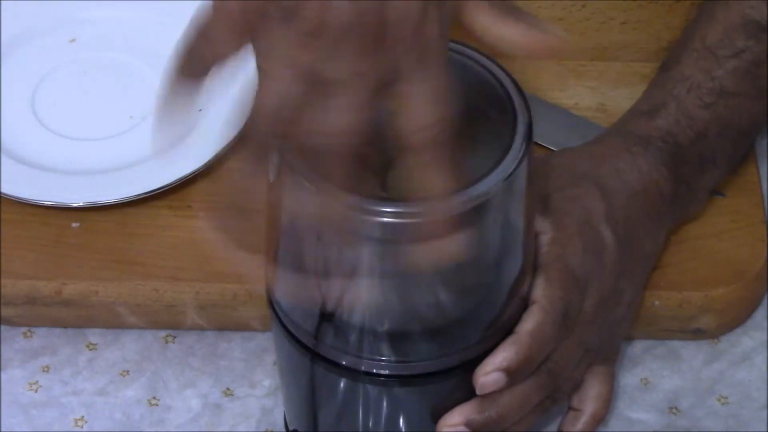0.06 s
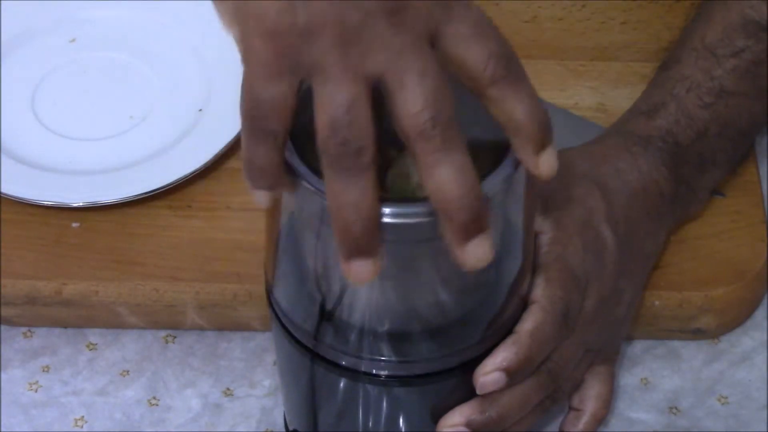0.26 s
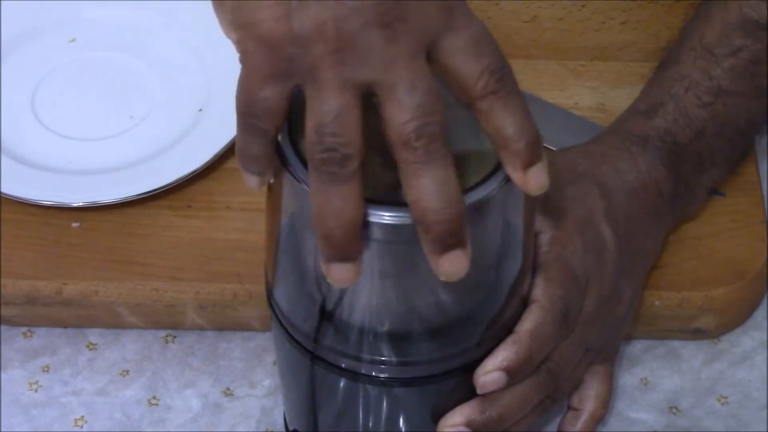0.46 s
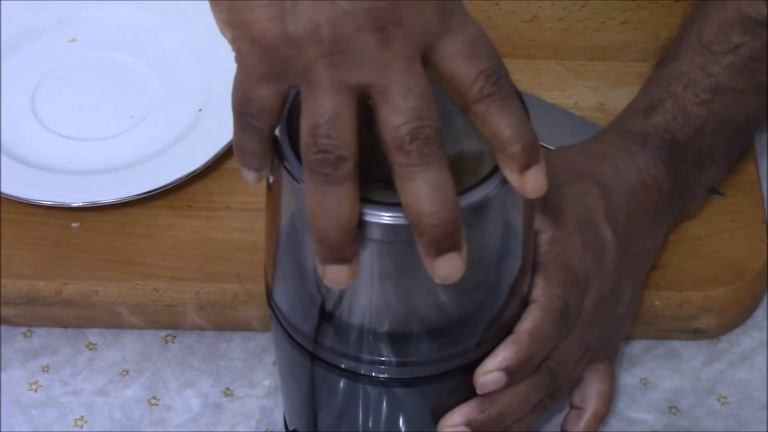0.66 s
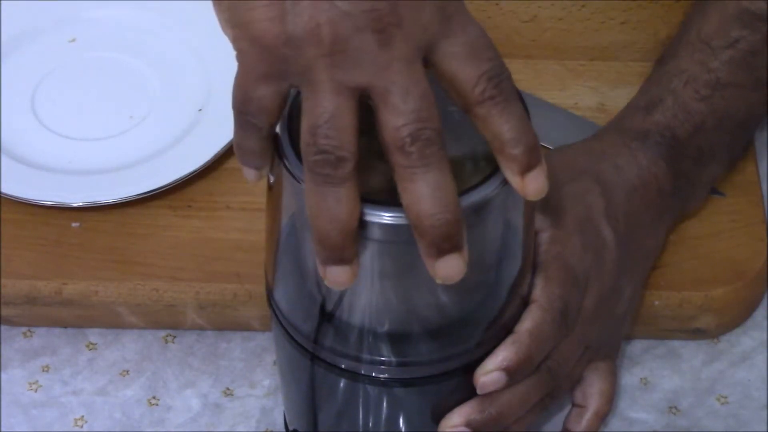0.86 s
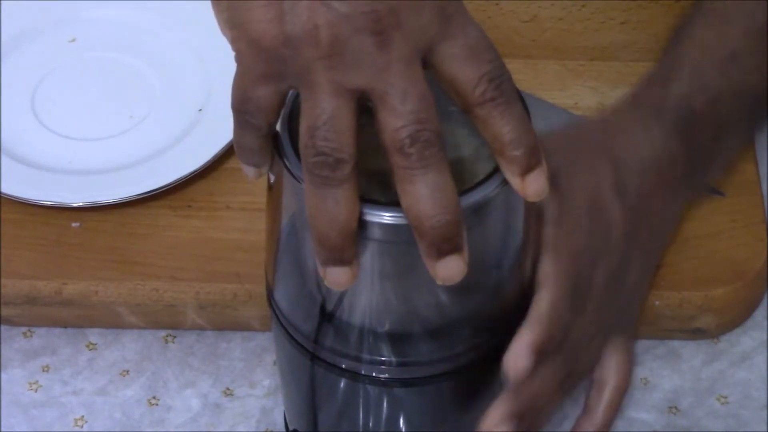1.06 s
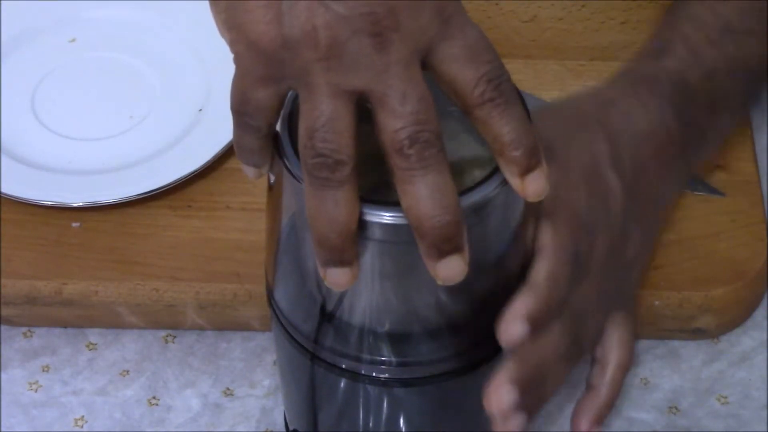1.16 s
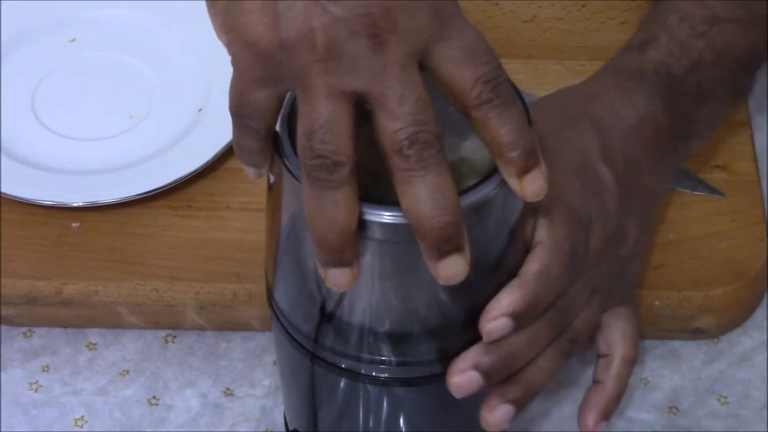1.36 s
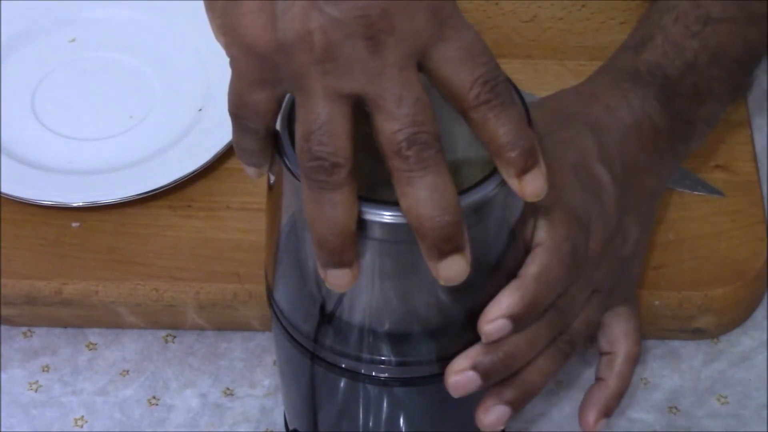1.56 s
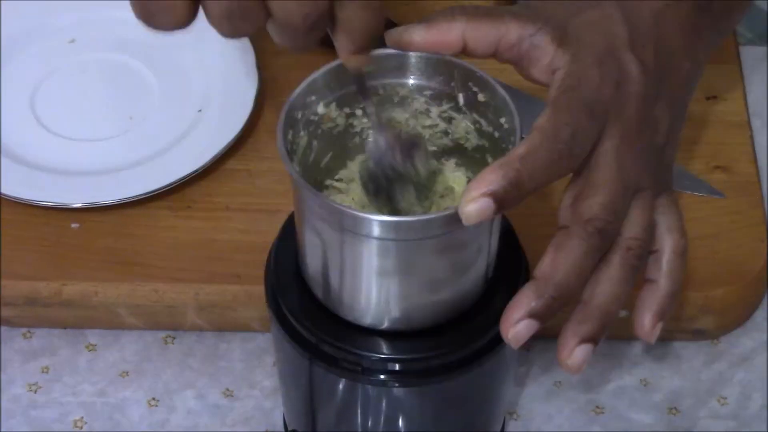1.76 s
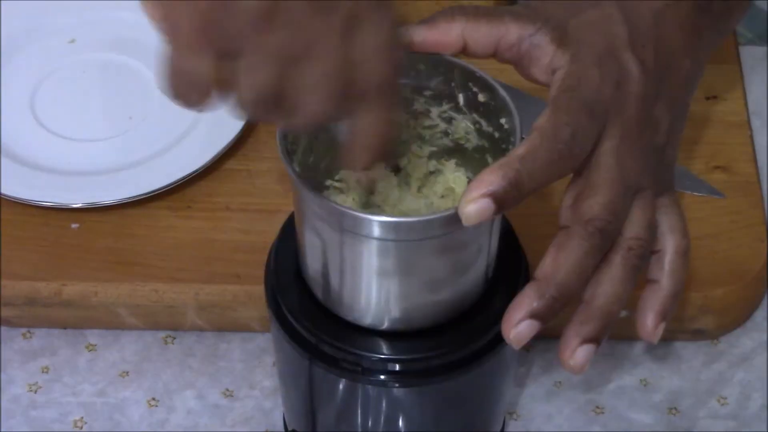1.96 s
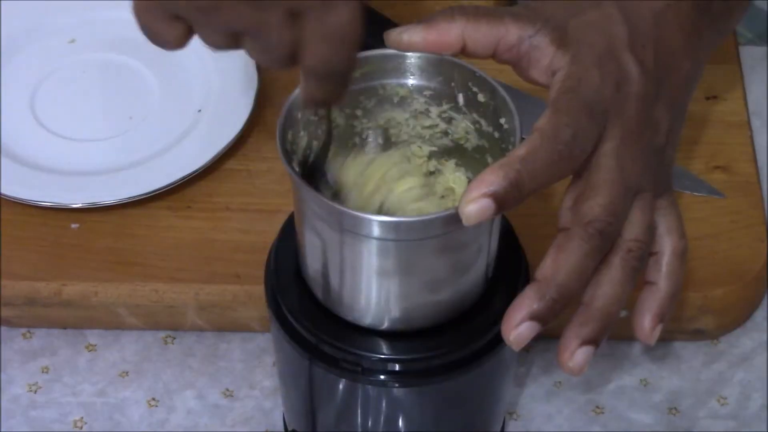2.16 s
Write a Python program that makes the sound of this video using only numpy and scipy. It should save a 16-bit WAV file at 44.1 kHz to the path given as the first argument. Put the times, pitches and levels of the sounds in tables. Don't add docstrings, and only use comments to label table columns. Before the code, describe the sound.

Harsh wet whirr of a kitchen grinder slowing down, cut to a spoon scraping in a metal cup

```python
import sys
import numpy as np
from scipy import signal
from scipy.fft import rfft, irfft, next_fast_len
from scipy.io import wavfile
from scipy.ndimage import uniform_filter1d, map_coordinates

SR = 44100
rng = np.random.default_rng(int(sys.argv[2]) if len(sys.argv) > 2 else 0)


def rack_gain(trim_db):
    fader = np.asarray(trim_db, float)
    return 10 ** (fader / 20)


def output_pcm(signal):
    pcm = np.clip(np.atleast_2d(signal).T, -1, 1) * 32767
    wavfile.write(sys.argv[1], SR, np.round(pcm).astype(np.int16))


N = 99225
T = np.arange(N) / SR
START_S, RELEASE_S, CUT_S = 0.2495, 1.295, 1.768
TILT_HZ = 2140


def unit(x):
    return x / np.sqrt(np.mean(x ** 2) + 1e-20)


def along(points, hz):
    f, v = np.transpose(points)
    return np.interp(np.log(hz + 1), np.log(f + 1), v)


def wobble(rate):
    knots = rng.standard_normal(int(N * rate / SR) + 4)
    return map_coordinates(knots, [np.arange(N) * rate / SR])


def filtered(x, response):
    m = next_fast_len(N + SR // 2)
    return irfft(rfft(x, m) * response(np.fft.rfftfreq(m, 1 / SR)), m)[..., :N]


def ringing(x, modes):
    def body(f):
        total = 0
        for k, (hz, width, db) in enumerate(modes):
            total = total + (-1) ** k * rack_gain(db) * 1j * f * width / (hz * hz - f * f + 1j * f * width)
        return total
    return filtered(x, body)


def coloured(x, spectrum):
    return unit(filtered(x, lambda hz: rack_gain(along(spectrum, hz))))


def treble(x):
    return filtered(x, lambda f: (1j * f / (TILT_HZ + 1j * f)) ** 2)


def chunks(noise_share, clump_db):
    per_s, spread_db = 2600, 2
    size_db = spread_db * np.minimum(rng.exponential(size=N), np.pi)
    hits = (rng.random(N) < per_s / SR) * rng.standard_normal(N) * rack_gain(size_db)
    clumps = rack_gain(clump_db * (wobble(50) + wobble(150)))
    return unit((unit(hits) + noise_share * rng.standard_normal(N)) * clumps)


def bursts(rows, rise_s=0.001):
    dull, bright = np.zeros(N), np.zeros(N)
    for s, db, t60, bright_db in rows:
        age = np.clip(T - s, 0, 3)
        burst = np.minimum(age / rise_s, 1) * rack_gain(db - 60 * age / t60) * rng.standard_normal(N)
        dull = dull + burst
        bright = bright + rack_gain(bright_db) * burst
    return dull - treble(dull) + treble(bright)


def patchy(x, depth_db):
    z = signal.stft(x, nperseg=256)[2]
    field = uniform_filter1d(rng.standard_normal(z.shape), size=6, axis=0)
    field = uniform_filter1d(field, size=3, axis=1)
    return signal.istft(z * rack_gain(depth_db * unit(field)), nperseg=256)[1][:N]


def swells(rows, unsteady=0.75):
    total = np.zeros(N)
    for s, long_s, hz, db in rows:
        envelope = rack_gain(db + 2.5 + 1.5 * wobble(70)) * np.exp(-((T - s) / long_s) ** 2 * 2)
        total = total + envelope * np.sin(2 * np.pi * hz * T + unsteady * wobble(60))
    return total


# hz, level_db (per Hz)
FLOOR = [(18, -49), (30, -19), (221, -4.5), (295, -1), (554, -16), (666, -10.5), (1190, -21.5), (5740, -31),
         (16000, -44.5)]


def room_floor():
    return rack_gain(-40.5 + 1.8 * wobble(8.28)) * coloured(rng.standard_normal(N), FLOOR)


# hz, t60_s
ROOM_DECAY = [(200, 0.67), (2000, 0.7), (10000, 0.14)]
# hz, side_under_mid_db
ROOM_WIDTH = [(60, -30), (150, -46.5), (380, -26), (950, -21), (2400, -16), (6000, -18.5), (10000, -29.5),
              (15000, -12)]


def kitchen(x):
    wet_db, side_db = -10, -5.5
    hz, t, z = signal.stft(rng.standard_normal((2, SR // 2)), SR, nperseg=256)
    tail = signal.istft(z * rack_gain(-60 * t / along(ROOM_DECAY, hz)[:, None]), SR, nperseg=256)[1]
    tail = np.pad(tail, ((0, 0), (0, N)))[:, :N]
    tail = filtered(tail, lambda f: np.sqrt(along(ROOM_DECAY, 200) / along(ROOM_DECAY, f)))[:, :SR // 2]
    tail = tail / np.linalg.norm(tail[0])
    delayed = np.pad(x, (200, 0))[None]
    mid, side = signal.fftconvolve(delayed, tail, axes=1)[:, :N]
    mid = x + rack_gain(wet_db) * mid
    side = filtered(side, lambda f: rack_gain(side_db + along(ROOM_WIDTH, f)))
    return np.array([mid + side, mid - side])


# start_s, level_db, t60_s, brightness_db
PRESSES = [
    (.1365, -28, 0.016, 3),
    (.142, -24.5, 0.046, -6),
    (.176, -37, 0.13, -15),
    (.196, -33, 0.13, 1),
    (.219, -33.5, 0.033, 26),
    (.224, -35.5, 0.7, 11),
    (.2415, -35, 0.06, 17),
    (.2497, -17, 0.017, 14),
]
# pitch_hz, width_hz, level_db
LID_MODES = [(255, 48, 22.5), (670, 600, 2), (1068, 41, 16), (2070, 170, 0), (2550, 230, 3),
             (3270, 790, -4), (5500, 2200, -14.5), (8200, 1600, -14), (12000, 6800, -24)]


def hand():
    earlier = bursts([(0, -40, 0.3, 1.5)])
    return 4 * ringing(bursts(PRESSES) + earlier, LID_MODES)


# start_s, level_db, t60_s, brightness_db
SPOON_TAPS = [
    (1.842, -36, 0.023, 28),
    (1.8568, 0.5, 0.022, 1.5),
    (1.868, -18.5, 0.34, -24),
    (1.953, -17.5, 0.027, 1),
]
# pitch_hz, width_hz, level_db
OPEN_CUP_MODES = [(298, 72, 7.5), (687, 100, 2), (847, 63, 13.5), (1700, 370, -17), (2500, 260, -11),
                  (4000, 210, -5), (4600, 220, -8), (5500, 130, -14), (6600, 150, -15), (7300, 730, -17),
                  (9250, 160, -7), (11000, 470, -14), (12400, 1500, -27)]
# start_s, length_s, level_db, spoon_ring_db
STROKES = [
    (1.859, 0.04, -31.5, -24),
    (1.909, 0.029, -15, -11.5),
    (1.943, 0.021, -18, -22),
    (1.97, 0.022, -26, -20),
    (1.995, 0.029, -30.5, 1),
    (2.023, 0.022, -33, -1),
    (2.04, 0.027, -36.5, 5.5),
    (2.064, 0.068, -45, -7),
]
# hz, level_db (per Hz)
RASP_SPECTRUM = [(120, -28), (200, -4.5), (806, -1.5), (1810, -8.5), (2210, -9.5), (2800, -7.5),
                 (8740, -17.5), (13800, -25), (16000, -39)]
# pitch_hz, width_hz, level_db
SPOON_MODES = [(2945, 71, -8), (3740, 110, 2.5), (5880, 240, 3.5), (6780, 140, 6), (7600, 140, 5.5),
               (8960, 170, -6), (10200, 360, -11), (12500, 1500, -9)]
# peak_s, length_s, pitch_hz, level_db
SPOON_SQUEAKS = [
    (1.93, .015, 8300, -31.5),
    (1.962, 0.011, 3850, -28),
    (2.008, .015, 2980, -28),
    (2.006, .015, 4500, -36),
    (2.005, 0.013, 5950, -34),
    (2.055, .018, 7600, -36),
]


def spoon():
    rub = chunks(noise_share=1.2, clump_db=2.2)
    rasp = coloured(rub, RASP_SPECTRUM)
    ring = unit(ringing(rub, SPOON_MODES))
    strokes = np.zeros(N)
    for s, long_s, db, ring_db in STROKES:
        rise = np.clip((T - s) / 0.011, 0, 1)
        fall = rack_gain(-60 * np.clip(T - s - long_s, 0, 3) / 0.03)
        strokes = strokes + rack_gain(db) * rise * fall * (rasp + rack_gain(ring_db) * ring)

    def dead_spot(f):
        hz, width_hz, db = 550, 135, -14
        return 1 - (1 - rack_gain(db)) * 1j * f * width_hz / (hz ** 2 - f * f + 1j * f * width_hz)

    taps = 5 * ringing(bursts(SPOON_TAPS), OPEN_CUP_MODES)
    return filtered(taps + strokes, dead_spot) + swells(SPOON_SQUEAKS)


def motor_hum():
    mains_hz, level_db, surge_db, surge_t60 = 101.7, -19.5, 16.5, 0.49
    surge = 1 + rack_gain(surge_db - 60 * np.abs(T - START_S) / surge_t60)
    return rack_gain(level_db + 1.8 * wobble(9.9)) * surge * np.sin(2 * np.pi * mains_hz * T + wobble(14))


# pitch_hz, width_hz, level_db
BASE_MODES = [(99.4, 6.1, -12.5), (143.8, 4.2, 0), (170.8, 5.3, -8.5), (197.7, 14, -0.5), (213.5, 33, 1.5),
              (277, 38, 1), (334.7, 12, 6.5), (374.6, 14.2, 0.5), (431.3, 22.4, -4.5), (500, 21, -16),
              (580, 30, -17.5)]


def drumming_base(drum_db, coast):
    tilt_db = 14
    base = unit(ringing(chunks(noise_share=1.06, clump_db=0.34), BASE_MODES))
    higher = unit(filtered(base, lambda f: rack_gain(tilt_db * np.log2(np.clip(f, 20, 700)))))
    return rack_gain(-1 + drum_db) * ((1 - coast) * base + coast * higher)


# start_s, level_db, t60_s
LID_JOLTS = [
    (0.249, -1.5, 1),
    (0.613, -5, 0.49),
    (1.342, -8.5, 0.72),
]


def lid_buzz(blows):
    jolt = sum((T >= s) * rack_gain(db - 60 * np.abs(T - s) / t60) for s, db, t60 in LID_JOLTS)
    return jolt * unit(ringing(blows, [(1064, 38, 0)]))


def wall_grit(hard, slap, coast):
    corner_hz = 7000
    ticks = chunks(noise_share=0.32, clump_db=3) * slap + 0.66 * hard
    grit = unit(filtered(ticks, lambda f: (1j * f / (corner_hz + 1j * f)) ** 4))
    return rack_gain(-29 - 6.4 * coast) * patchy(grit, depth_db=3.5)


# time_s, pitch_hz, clean_part_db
BLADE_PITCH = [(.25, 3748, 2.5), (.6, 3684, -8), (.85, 3630, -15), (1.1, 3640, -13), (1.25, 3547, -7),
               (1.4, 3680, -15), (1.76, 3520, -14)]


def blade_ring(ring_db, clang, slap):
    width_hz, loaded_width_hz, loaded_db = 19, 380, -3
    s, ring_hz, clean_db = np.transpose(BLADE_PITCH)
    turn = np.exp(2j * np.pi * np.cumsum(np.interp(T, s, ring_hz)) / SR)
    kick = (chunks(noise_share=3.1, clump_db=0.5) * slap + 1.73 * clang) / turn

    def resonance(pole):
        slow = filtered(kick.real, pole) + 1j * filtered(kick.imag, pole)
        return unit((slow * turn).real)

    clean = resonance(lambda f: 1 / (1 + 2j * f / width_hz))
    loaded = resonance(lambda f: 1 / (1 + 2j * f / loaded_width_hz) ** 2)
    return rack_gain(0.5 + ring_db) * (rack_gain(np.interp(T, s, clean_db)) * clean + rack_gain(loaded_db) * loaded)


# pitch_hz, width_hz, level_db, change_db once paste coats the wall
CUP_MODES = [(1120, 190, -8, 5), (1289, 15, 12, 0.5), (1439, 95, 5, -1.5), (1658, 31, 8, -2.5),
             (2017, 96, 3.5, -15), (2446, 16, 3, -1.5), (4950, 82, -17.5, 3), (5600, 300, -6, 2.5),
             (7280, 156, -14.5, 5.5), (7900, 110, -1, -16), (8960, 140, -19, -13), (9700, 320, -10.5, -2),
             (11170, 920, -20.5, -2), (12060, 1000, -17, 0.5)]
# hz, level_db (per Hz)
CHURN_SPECTRUM = [(35, -51), (60, -74), (146, 5.5), (346, -4), (593, -3), (3040, -11.5), (3670, -16),
                  (7750, -18), (16000, -31.5)]


def cup_wall(blows, hard, bite_db, coast):
    struck = blows + hard
    bare = ringing(struck, [(hz, width, db) for hz, width, db, _ in CUP_MODES])
    coated = ringing(struck, [(hz, width, db + more_db) for hz, width, db, more_db in CUP_MODES])
    paste = np.clip((T - START_S) / (CUT_S - START_S), 0, 1)
    wall = rack_gain(-5.5) * unit((1 - paste) * bare + paste * coated)
    wall = wall + rack_gain(-4.5) * coloured(blows + 1.83 * hard, CHURN_SPECTRUM)
    wall = patchy(wall, depth_db=1.96)
    wall = wall + (rack_gain(11 + bite_db) - 1) * treble(wall)
    spray_hz, spray_db = 10400, -1.5 - 19 * coast
    return wall + (rack_gain(spray_db) - 1) * filtered(wall, lambda f: 1 / (1 + (spray_hz / (f + 1)) ** 4))


# start_s, level_db (peak), blade_ring_db
HARD_CHUNKS = [(0.3025, 0, -6), (0.399, -2, -9), (0.415, -12, 0), (0.467, -3.5, -3), (0.5057, -6, 2),
               (0.548, -7.5, -10), (0.554, -7, 4), (0.615, -0.5, -6), (0.632, 0, 0), (0.658, -8, -3),
               (0.6747, -2.5, -7), (0.685, -8, -9), (0.7224, 3.5, -1.5), (0.799, -6, 4), (0.9138, -7, -8),
               (0.938, -7, -10), (0.954, 0, -8), (0.9762, -11, -9), (1.0191, -16, 0), (1.0462, 7, 1),
               (1.094, 1.5, 3), (1.135, 3.5, 0.5), (1.1723, -8, -4), (1.235, -3, -1), (1.303, -9, 2),
               (1.3382, 4.5, -1.5), (1.3873, -16, -7), (1.429, -7, -1), (1.4806, -16, 4),
               (1.521, -5.5, -1.5), (1.5898, -9, -4), (1.6113, -10, -17), (1.709, -6.5, 1.5),
               (1.7305, -3.5, -3)]


def hard_strikes(effort_db, rings):
    rows = [(s, db - 0.5 + rings * more_db, 0.035, 0) for s, db, more_db in HARD_CHUNKS]
    return treble(bursts(rows, rise_s=0.0023)) / rack_gain(effort_db)


# time_s, passes_count over the lump
BLADE_PASSES = [(1.3, -11), (1.3634, 0), (1.4265, 10), (1.4832, 20), (1.5417, 30), (1.6473, 45),
                (1.7468, 60), (1.8, 68)]


def blade_passes(coast):
    fall_db, spread_db, scatter, peak = 19, 2, 0.08, 0.35
    count = np.interp(T, *np.transpose(BLADE_PASSES)) + scatter * wobble(60) + 12.4
    size_db = spread_db * rng.standard_normal(100)[count.astype(int)]
    phase = count % 1
    away = np.maximum(1 - phase / peak, (phase - peak) / (1 - peak))
    gain = rack_gain(size_db - fall_db * away)
    return (gain / np.sqrt(np.mean(gain[coast > 0] ** 2))) ** coast


# time_s, effort_db, drumming_db, blade_bite_db, blade_ring_db
GRINDING = [(0.255, -12, -18, -8, -7), (0.263, -9.5, 5, -8, -16), (0.291, -10, -2.5, -15.5, -19),
            (0.325, -12, 5, -7.5, -12.5), (0.741, -11.5, -1.5, -11, -12), (0.905, -13.5, -9.5, -6.5, -8.5),
            (0.935, -9.5, -3, -9.5, -8.5), (1.113, -10.5, -4.5, -10.5, -10),
            (1.267, -9.5, -6.5, -11.5, -13.5), (1.297, -12.5, 0.5, -3.5, -12),
            (1.305, -8.5, -14, -12.5, -9.5), (1.347, -7, -17, -8.5, -6), (1.373, -10, -5, -9, -19),
            (1.393, -10, -8, -8.5, -4.5), (1.545, -13, -3, -10.5, -10), (1.575, -15, -0.5, -9.5, -10),
            (1.709, -13.5, -2.5, -11, -8), (1.765, -14, -4, -12.5, -12.5)]
# peak_s, length_s, pitch_hz, level_db
MODE_SWELLS = [(.151, 0.0085, 1068, -25.5), (1.66, 0.059, 100, -28), (.42, 0.026, 3686, -13),
               (.95, .04, 1650, -17.5), (1.098, 0.011, 3680, -12), (1.29, 0.027, 218.3, -21),
               (1.41, 0.055, 608.6, -18.5), (1.43, .05, 500, -20), (1.465, 0.032, 435, -21),
               (1.53, 0.067, 580, -21.5), (1.6, 0.051, 365, -18)]


def grinder():
    s, *columns = np.transpose(GRINDING)
    effort_db, drum_db, bite_db, ring_db = [np.interp(T, s, c) for c in columns]
    coast = np.clip((T - RELEASE_S) / 0.08, 0, 1)
    slap = blade_passes(coast)
    blows = chunks(noise_share=1.0, clump_db=1.0)
    blows = blows + (slap - 1) * treble(blows)
    hard = hard_strikes(effort_db, rings=0)
    clang = hard_strikes(effort_db, rings=1)
    run = motor_hum() + drumming_base(drum_db, coast) + lid_buzz(blows)
    run = run + wall_grit(hard, slap, coast) + blade_ring(ring_db, clang, slap)
    run = run + cup_wall(blows, hard, bite_db, coast)
    return (T >= START_S) * rack_gain(effort_db) * run + swells(MODE_SWELLS)


def scene():
    grinding = (T < CUT_S) * kitchen(grinder() + hand())
    return grinding + kitchen(spoon()) + room_floor()


def band_limit(x):
    return signal.sosfilt(signal.butter(12, 16520, fs=SR, output="sos"), x)


def record(dry):
    low_cut_hz, rumble_cut_hz, top_hz = 27, 62, 15900
    threshold_db, share, memory_s = -12.5, 0.36, 0.0043
    top, knee = 0.92, 4.5
    x = filtered(dry, lambda f: (1j * f / (low_cut_hz + 1j * f)) ** 2)
    power = filtered(np.mean(x ** 2, axis=0), lambda f: 1 / (1 + 2j * np.pi * f * memory_s))
    level = np.sqrt(np.abs(power))
    x = x * np.maximum(level / rack_gain(threshold_db), 1) ** -share
    x = x / (1 + np.abs(x / top) ** knee) ** (1 / knee)
    x = filtered(x, lambda f: (f < top_hz) * (1j * f / (rumble_cut_hz + 1j * f)) ** 2)
    return band_limit(x)


dry = scene()
out = record(dry)
output_pcm(out)
```